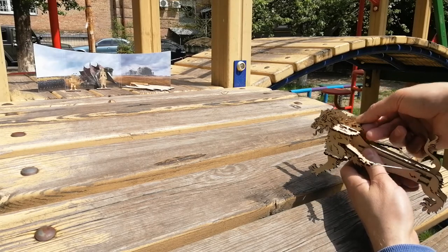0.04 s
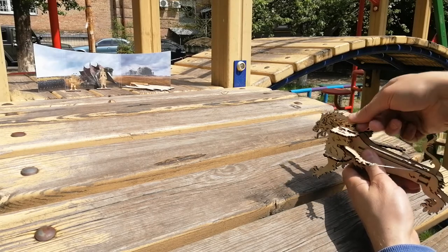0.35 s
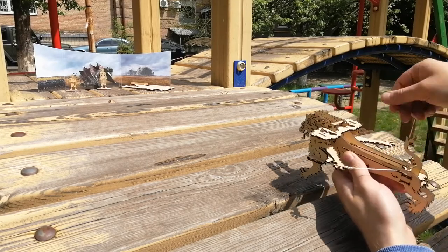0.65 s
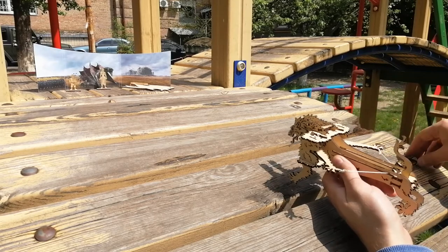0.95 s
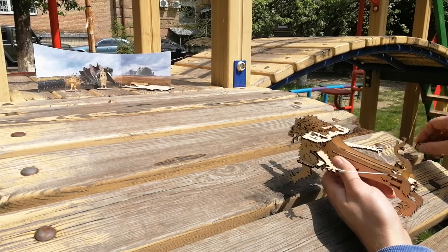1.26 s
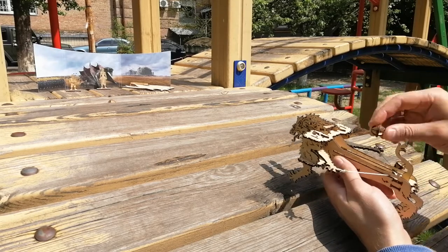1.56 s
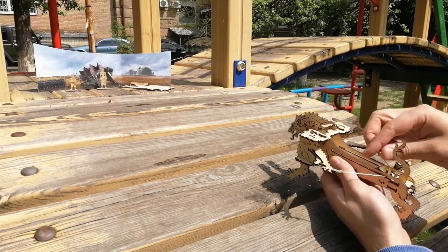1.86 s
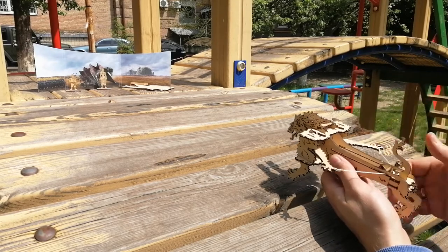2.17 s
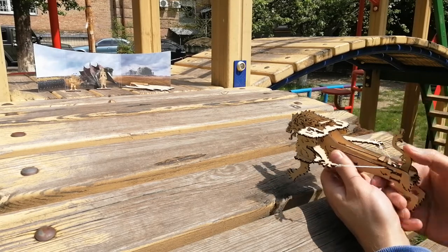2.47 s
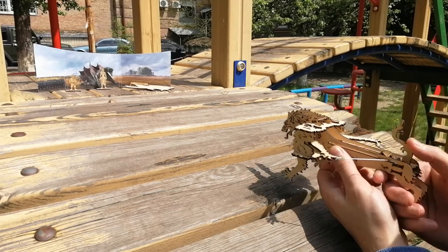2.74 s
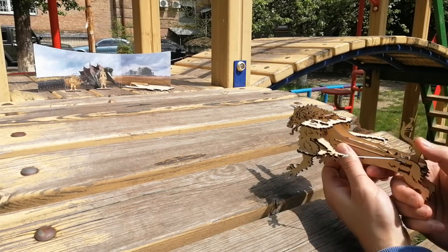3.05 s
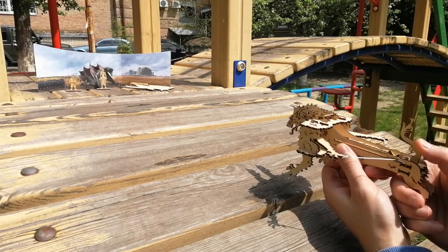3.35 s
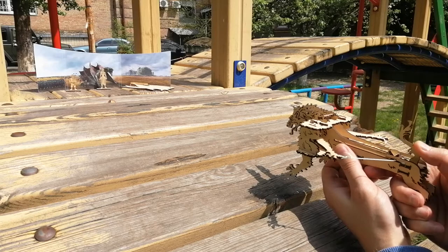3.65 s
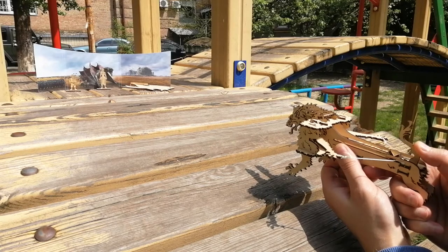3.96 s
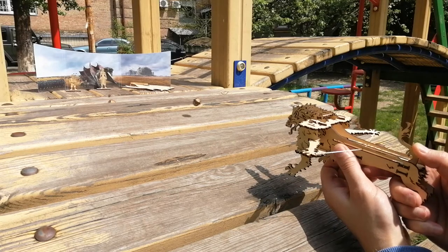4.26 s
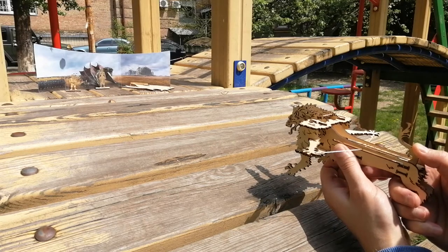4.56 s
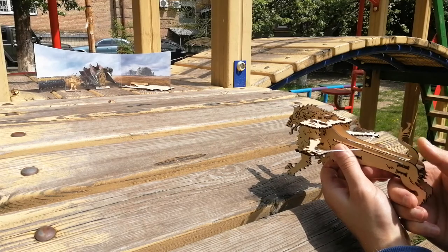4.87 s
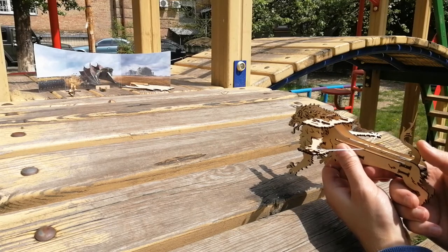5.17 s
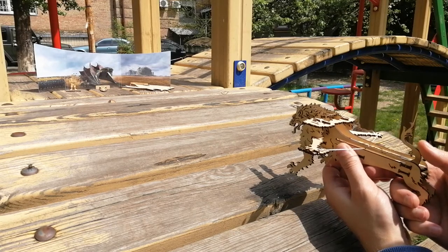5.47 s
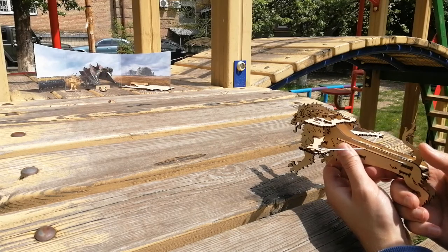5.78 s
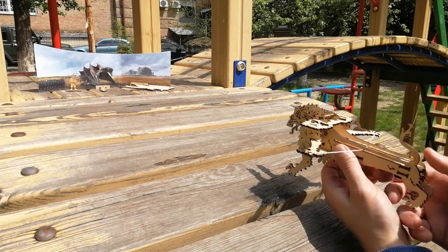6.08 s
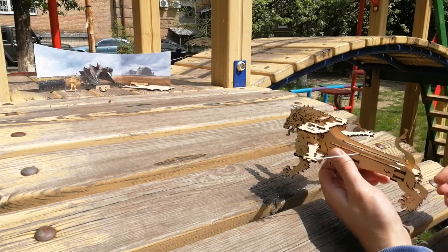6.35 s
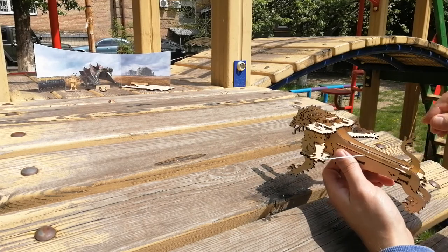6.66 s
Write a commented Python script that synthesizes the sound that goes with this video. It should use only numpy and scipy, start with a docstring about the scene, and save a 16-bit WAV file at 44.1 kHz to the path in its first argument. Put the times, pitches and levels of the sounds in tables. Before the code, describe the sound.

A low town rumble, a soft hush and a faint mains hum run throughout, outdoors. Close to the microphone, fingers rub faintly on a small plywood toy catapult. Around 1.7 to 1.9 seconds a pellet goes into its groove with a few dry clicks and a tiny scrape, while a very faint, thin squeal swells and fades far away. Soft rubbing and a small tick follow. At 3.7 seconds the catch snaps in sharply, slightly left, the loudest click. At 4.2 the toy fires with a quick rattling clack. The pellet skips off a board at 4.3 and hits a card target around 4.5, which clatters over with a slight thud. From 4.7 to 5.4 the pellet and small pieces patter on more distant boards. A brief wind buffet comes at 5.7, then a faint sleeve swish and light gusts from about 6.6 seconds.

```python
"""Outdoors on a wooden deck, a small plywood toy catapult is loaded, cocked and fired close by.
The pellet skips off the boards, knocks a card target over and patters to rest. Each hit is a dry
crack plus the short ring of the part struck; fingers and a sleeve rub with a grainy hiss.
Behind it sit a low town rumble, light wind on the microphone, a faint mains hum and one far squeal."""
import sys
import numpy as np
from scipy import signal
from scipy.fft import rfft, irfft, next_fast_len
from scipy.io import wavfile
from scipy.ndimage import uniform_filter1d, map_coordinates

SR = 44100
rng = np.random.default_rng(int(sys.argv[2]) if len(sys.argv) > 2 else 0)


def to_wav(sig):
    """Store sig (one row per channel, or 1-D mono) as 16-bit WAV at the path in sys.argv[1].

    Samples outside -1..1 are clipped; the rate is SR.
    """
    pcm = np.clip(np.atleast_2d(sig), -1, 1) * 32767
    pcm = np.round(pcm).astype(np.int16)
    wavfile.write(sys.argv[1], SR, pcm.T)  # frames by channels


N = 305166

# Light touches on the groove's rim: start_s, level_db, brightness_db_per_octave
RIM_TOUCHES = [(.182, -62, -3), (1.167, -63.5, 3), (1.724, -47, -3), (1.729, -49.5, -1.5),
               (1.7495, -45, -2), (1.968, -55, 0), (2.908, -56.5, -1.5)]
# The catch snaps in: start_s, relative_level_db, pan_left_db, brightness_db_per_octave
CATCH_SNAPS = [(3.6553, -27, 3, 1), (3.6565, -16.5, 6.5, -.5)]
# The released slider chatters along the frame: start_s, level_db, brightness_db_per_octave
SLIDER_CHATTER = [(4.2113, -34.5, 4), (4.2135, -40, 2), (4.2168, -43, 0), (4.2191, -28, -1.5),
                  (4.2225, -25, -1), (4.2263, -23.5, -.5), (4.2345, -38, -1.5), (4.2388, -33.5, .5)]
# The slider crosses from left to right: time_s, pan_left_db
SLIDER_PAN = [(4.222, 7), (4.243, -6)]
# The pellet skips off a board; the last row is a faint echo of it off the deck: start_s, level_db, pan_left_db,
# brightness_db_per_octave
BOARD_SKIP = [(4.3378, -26.5, 4, 1.5), (4.3405, -42, 0, 7), (4.349, -44, -3, 4)]
# Knocks on the card target: start_s, level_db, brightness_db_per_octave
CARD_KNOCKS = [(4.449, -31, 7), (4.452, -40, 0), (4.456, -44, -1), (4.4595, -42, 1), (4.4647, -32.5, -1),
               (4.4733, -30, 0), (4.4765, -40, -6), (4.484, -35.5, -1.5), (4.4875, -31.5, -1),
               (4.494, -39, -8), (4.502, -46, -6), (4.53, -53, -2), (4.705, -44.5, .5)]
# Pieces land on the far boards: start_s, level_db, brightness_db_per_octave, first_flight_s, pitch_ratio
LANDINGS = [(4.752, -38, 1, 0.0045, 1), (4.891, -44.5, -1.5, 0.003, 1.12), (4.919, -46, -1, .004, .88),
            (4.926, -47, -2.5, .009, .95), (4.99, -57.5, -3.5, .008, .95), (5.03, -60, -5, .005, .7),
            (5.13, -56, -6, 0.0066, .7), (5.172, -59, -4, .005, .8), (5.306, -43.5, -2, .015, .98)]

# The ring of each struck part: pitch_hz, relative_level_db, t60_s
RIM_MODES = [(1785, -1, 0.035), (2030, -6, .025), (2760, 1, 0.025), (3350, -5, .016), (4220, -2, 0.022),
             (5760, 1, 0.019), (7320, -9.5, 0.017)]
GROOVE_MODES = [(2310, -1.5, 0.029), (2480, -7, 0.014), (2630, -6, .02), (2770, -5, 0.02),
                (2970, -10, .012), (5620, -8, .01), (5850, -2, 0.01), (7300, -18, .012), (8900, -18, .008)]
CATCH_MODES = [(2140, -3, 0.018), (2380, -4, 0.016), (2590, 6.5, 0.014), (3300, -10, .012), (3600, -8, .01),
               (3860, -4, 0.012), (4270, -9, .014), (4850, -8, 0.011), (6120, 5, 0.0105),
               (10280, -6, 0.009), (11300, -4, 0.009), (12200, -11, .007)]
FRAME_MODES = [(1590, -7, .016), (1850, 0, 0.017), (2100, -1, 0.016), (2340, -3, .014), (2560, 1, 0.016),
               (2740, 0, .02), (3500, -7, 0.012), (4150, -5, .016), (4600, -5, .016), (5920, -2, 0.017),
               (6840, -5, .014), (7380, -4, 0.018)]
STOP_MODES = [(1725, 2.5, 0.025), (2100, -8, .018), (2560, -6, .016), (2740, -6, .02), (3175, -8, 0.016),
              (3480, -3, .011), (3640, 0, .012), (3830, -3, .011), (4152, -3.5, 0.02), (4370, -7, .016),
              (4540, 0, .02), (4700, -2, .017), (5770, -14, .011), (6840, -12, .018), (7395, -9, .018)]
BOARD_MODES = [(1170, -10, 0.02), (1820, 3, 0.013), (2060, 2, 0.0097), (2390, -8, .008), (2700, -7, 0.008),
               (3600, -19, .008)]
PELLET_MODES = [(3950, -3, .008), (4350, 0, .01), (4800, -1, .009), (5650, -5, .009)]
CARD_MODES = [(290, -7, 0.053), (740, -8, 0.02), (1030, -11, .02), (1216, -3.5, .028), (1390, -1, 0.027),
              (1800, 0, 0.021), (2050, -3, .02), (2340, 1, 0.02), (2650, -3, 0.019)]
DECK_MODES = [(1070, -4, .03), (1540, -3, .025), (1860, 0, .028), (2480, -2, .024), (2760, 0, .026),
              (3170, -3.5, .022), (3430, -4, .026), (3750, -5, .02), (5120, -5, .016), (5920, -7, .016)]
DECK_BASS_MODES = [(80.6, -3, 0.27), (139, -0.5, 0.21), (189, -2, .12), (231, -1, 0.12)]
# EQ of the dry crack on each surface: freq_hz, gain_db
GROOVE_CRACK = [(200, -35), (1150, -18), (1850, 0), (3000, 0), (3700, -5), (4300, -3), (5800, 0),
                (7400, -4), (9200, -6), (10600, -13), (12000, -13), (16400, -44)]
CATCH_CRACK = [(200, -28), (1400, -18), (2400, 2), (3200, -4), (4500, -5), (6100, 0), (7000, -4),
               (8000, -3), (9200, -8), (11700, -3.5), (13000, -10), (16400, -36)]
FRAME_CRACK = [(200, -30), (1300, -26), (1850, -3), (3500, 0), (4500, 1), (5400, -6), (7200, -3),
               (9000, -7), (10500, -9), (11700, -8), (13000, -13), (15000, -27), (16400, -46)]
PELLET_CARD_CRACK = [(120, -8), (290, -2), (480, -7), (750, -2), (1400, 0), (3100, -2), (5000, 0),
                     (8000, -8), (9700, -7), (11500, 1.5), (13300, -10), (15800, -28)]
DECK_CRACK = [(150, -15), (650, -2.5), (1000, 2.5), (1500, 4.5), (2700, 4.5), (3500, 1.5), (5900, -3.5),
              (9100, -14), (12600, -10), (15900, -23)]

# Fingers slide over the toy: centre_s, length_s, skin_db, plywood_db
FINGER_RUBS = [(0.06, 0.09, -73, -79), (0.18, 0.06, -72, -70), (0.465, 0.056, -75, -79),
               (2.213, 0.23, -79, -75), (2.463, 0.15, -78, -63.5), (2.592, 0.07, -80, -71),
               (3.084, 0.037, -78, -68), (6.06, 0.18, -79, -77)]
# The sleeve scuffs as the hand lets go: centre_s, length_s, level_db, pitch_ratio
SLEEVE_SCUFFS = [(6.56, .06, -66, 1), (6.69, .22, -58, 1), (6.78, .06, -57, 1.02), (6.825, .07, -62, 1.02),
                 (6.9, .09, -64, .94)]
# Friction EQ of rubbed plywood, the pellet in its groove and cloth: freq_hz, gain_db
PLYWOOD_EQ = [(1000, -22), (1700, -3), (2800, 3.5), (3600, -7), (5200, 0), (6600, -7), (9000, -15),
              (15000, -30)]
SCRAPE_EQ = [(900, -19), (1780, 3), (2200, -1), (2800, 0), (3600, -11), (4200, -3), (4900, -10), (5700, -3),
             (7600, -8), (9500, -20), (15000, -25)]
CLOTH_EQ = [(500, -23), (4000, -16), (8000, -16), (9500, -6.5), (10800, -2), (12000, -11), (14500, -22),
            (16000, -35)]

# Reverb tail off the far walls: freq_hz, t60_s
WALL_DECAY = [(250, .26), (2000, 0.37), (4500, .3), (6200, 0.38), (9000, .31), (12000, 0.33)]
# The two microphone ports differ in colour: freq_hz, pan_left_db
PORT_COLOUR = [(1300, -2), (2800, 1), (5800, -0.5), (8100, 0.5), (9900, 4), (11600, -11.5), (13200, -7),
               (15100, -1.7)]
# Partials of a far squeal, perhaps a brake: pitch_hz, level_db
SQUEAL_PARTIALS = [(3130, -75.5), (3480, -74.5), (3828, -81)]
# Fader ride on those partials: time_s, gain_db
SQUEAL_FADER = [(1.35, -30), (1.5, -4), (1.58, -4), (1.8, 0.5), (2.05, -7), (2.3, -23)]
# Gusts on the microphone: peak_s, buffet_db, air_db, rise_s, fall_s
GUSTS = [(.095, -41, -75, .03, .03), (.2, -40, -70, .02, .03), (.36, -42, -70, .03, .03),
         (5.67, -34, -78, 0.019, 0.057), (6.755, -34, -55.5, 0.052, 0.049),
         (6.915, -31.5, -52.5, 0.033, 0.061)]
# Noise EQ of wind buffet, rushing air, low rumble and the hush of town and leaves: freq_hz, gain_db
BUFFET_EQ = [(10, -13), (25, -3), (70, 1), (140, -4.5), (190, -11), (260, -33), (600, -66)]
AIR_EQ = [(60, -11), (300, 0.5), (650, -2.5), (1800, -3), (2800, -3), (4000, -13.5), (8100, -22),
          (15900, -36)]
RUMBLE_EQ = [(8, -20.5), (20, -5), (35, 1), (60, 0.5), (100, -5.5), (150, -11.5), (220, -14), (300, -23.5),
             (600, -65)]
HUSH_EQ = [(140, -30.5), (240, -19), (262, -7), (335, -8), (407, -9), (598, -12.5), (726, -11), (1440, -16),
           (1630, -11.5), (4280, -27.5), (5670, -29.5), (8350, -39), (10300, -38.5), (16000, -46)]
# Fader rides on the rumble and the hush: time_s, level_db
RUMBLE_FADER = [(0.1, -46.5), (1.7, -47.5), (2.1, -49), (2.75, -50), (2.95, -44.5), (4.3, -48), (5.0, -47),
                (5.5, -49), (6.5, -48.5)]
HUSH_FADER = [(0.05, -60), (0.3, -58.3), (0.8, -59.3), (2.0, -61.0), (3.0, -60), (5.3, -61), (6.5, -61.0)]
# Mains hum partials: pitch_hz, level_db
MAINS_PARTIALS = [(100, -66.5), (150, -71.5), (199.9, -60.5)]
# Stereo image of the ambience: freq_hz, left_right_correlation
AMBIENCE_IMAGE = [(60, 1.0), (130, 0.98), (290, 0.47), (640, -0.59), (1410, 0.045), (3100, 0.048),
                  (6820, -0.11), (15000, -0.0047)]

SCRAPE_S, SCRAPE_LENGTH_S = 1.791, 0.085  # centre and length of the pellet's push along the groove


def catapult():
    """Hard plywood clicks: the pellet rocks into its groove, the catch snaps, the slider slams home."""
    rocking = bounces(1.855, -27, -12, flight_s=.0142, shrink=1, loss_db=6.5, dull_db=1.5)
    seating = placed([(1.8527, -29.5, 2)] + rocking, pan_db=8.5)  # clicks past the rim, then drops in
    slam = bounces(4.2417, -21.5, -.5, flight_s=.0028, shrink=.9, loss_db=2.4, dull_db=0)
    touches = placed(RIM_TOUCHES + slips(count=12), pan_db=5.5)
    rim = contacts(touches, RIM_MODES, GROOVE_CRACK, crack_db=-4.5, crack_t60=.026, lead_ms=.12)
    groove = contacts(seating, GROOVE_MODES, GROOVE_CRACK, crack_db=-10, crack_t60=.022, lead_ms=.14)
    catch = contacts(CATCH_SNAPS, CATCH_MODES, CATCH_CRACK, crack_db=-8.5, crack_t60=.03, lead_ms=.14)
    slider = contacts(on_slider(SLIDER_CHATTER), FRAME_MODES, FRAME_CRACK,
                      crack_db=-3.5, crack_t60=.021, lead_ms=.09)
    stop = contacts(on_slider(slam), STOP_MODES, FRAME_CRACK, crack_db=-4.5, crack_t60=.018, lead_ms=.05)
    return rim + groove + amp(-1.55) * catch + slider + stop


def contacts(hits, modes, crack_eq, crack_db, crack_t60, lead_ms):
    """Each hit layers a sharp crack over the part's ring; the left channel leads by lead_ms."""
    out, t = np.zeros((2, N + SR)), np.arange(SR // 8) / SR
    mode_hz, mode_db, t60 = np.transpose(modes)[:, :, None]
    # a part radiates little below its lowest mode
    low_cut = signal.butter(2, 1.35 * mode_hz.min(), "highpass", fs=SR, output="sos")
    for start_s, db, pan_db, bright_db in hits:
        tilt = lambda hz: bright_db * np.log2(np.clip(hz, 1000, 12000) / 3500)
        # each mode radiates a little differently to left and right
        phase = rng.uniform(0, 2 * np.pi, mode_hz.shape) + rng.normal(0, .18, (2, len(modes), 1))
        ring_db = mode_db + tilt(mode_hz) + rng.normal(0, 1.7, phase.shape)
        contact_s = .00018 * amp(-1.4 * bright_db)  # dull hits stay in contact longer
        attack = 1 - np.exp(-t / contact_s)
        detuned_hz = mode_hz * (1 + .005 * rng.uniform(-1, 1, mode_hz.shape))
        partials = amp(ring_db - 60 * t / t60) * np.sin(2 * np.pi * detuned_hz * t + phase)
        ring = signal.sosfilt(low_cut, attack * partials.sum(axis=1))
        grit = rng.standard_normal(len(t)) + 1.2 * rng.standard_normal((2, len(t)))
        grit *= amp(-60 * t / crack_t60)  # dense high modes that die at once
        grit[:, 0] += 7  # the spike of first touch
        grit = np.pad(grit, ((0, 0), (16, 0)))
        crack = filtered(grit, lambda hz: amp(along(crack_eq, hz) + tilt(hz)))[:, :len(t)]
        hit = unit(unit(ring) + amp(crack_db + bright_db) * unit(crack))
        hit = hit * np.sqrt(.005 / t[-1]) * amp(db) * sides(pan_db)  # level as if packed into 5 ms
        out[0, round(start_s * SR):][:len(t)] += hit[0]
        out[1, round((start_s + lead_ms / 1000) * SR):][:len(t)] += hit[1]
    return out[:, :N]


def bounces(start_s, db, bright_db, flight_s, shrink, loss_db, dull_db):
    """A hit and two rebounds, each losing energy; every flight is shrink times the one before."""
    k = np.arange(3)
    elapsed_s = np.concatenate([[0], np.cumsum(flight_s * shrink ** k)[:-1]])
    return list(zip(start_s + elapsed_s, db - loss_db * k, bright_db - dull_db * k))


def slips(count):
    """Tiny uneven ticks as the pellet catches and slips along its groove, loudest mid-push."""
    jitter, strength = rng.uniform(-1, 1, (count, 2)).T
    position = (np.arange(count) + .5 + jitter / 2) / count - .5
    level_db = -55 + 2.5 * strength + 20 * np.log10(np.cos(np.pi * position) + .01)
    return [(s, db, -1) for s, db in zip(SCRAPE_S + SCRAPE_LENGTH_S * position, level_db)]


def on_slider(hits):
    """Pan hits to follow the moving slider."""
    return [(s, db, np.interp(s, *np.transpose(SLIDER_PAN)), bright_db) for s, db, bright_db in hits]


def pellet():
    """The pellet skips off a board, then lands, loses most of its energy and patters in quickening hops."""
    land_s, land_db, flight_s, shrink = 5.0808, -42.5, .106, .575
    rebounds = bounces(land_s + flight_s, land_db - 14, -.71, flight_s * shrink, shrink,
                       loss_db=5, dull_db=-1.5)
    hops = placed([(land_s, land_db, .6)] + rebounds, pan_db=1.2)
    skip = contacts(BOARD_SKIP, BOARD_MODES, PELLET_CARD_CRACK,
                    crack_db=-16.5, crack_t60=.02, lead_ms=-.11)
    patter = contacts(hops, PELLET_MODES, PELLET_CARD_CRACK, crack_db=-4.5, crack_t60=.011, lead_ms=-.18)
    return skip + patter


def card_target():
    """The struck card clatters over, more papery crack than ring."""
    knocks = placed(CARD_KNOCKS, pan_db=.3)
    return contacts(knocks, CARD_MODES, PELLET_CARD_CRACK, crack_db=2, crack_t60=.017, lead_ms=-.17)


def falling_pieces():
    """Toppled pieces bounce on the far boards, each at its own pitch."""
    out = np.zeros((2, N))
    for *landing, pitch_ratio in LANDINGS:
        hits = placed(bounces(*landing, shrink=.95, loss_db=7, dull_db=.8), pan_db=-.7)
        modes = np.multiply(DECK_MODES, [pitch_ratio, 1, 1])
        out += contacts(hits, modes, DECK_CRACK, crack_db=2, crack_t60=.018, lead_ms=-.24)
    return out


def deck_thud(start_s=4.474, gain_db=-44):
    """The deck's low modes put weight under the falling target."""
    t = np.maximum(np.arange(N) / SR - start_s, 0)
    ring = sum(amp(db - 60 * t / t60) * np.sin(2 * np.pi * hz * t) for hz, db, t60 in DECK_BASS_MODES)
    return amp(gain_db) * ring


def rubbing():
    """Friction layer: skin hisses on plywood, the pellet scrapes its groove, the sleeve swishes."""
    skin_eq = lambda hz: -np.minimum(28 * np.log2((hz + 1) / 10000) ** 2, 50)  # a band around 10 kHz
    plywood_eq = lambda hz: along(PLYWOOD_EQ, hz)
    fingers = sum(stroke(s, length_s, skin_db, skin_eq) + stroke(s, length_s, plywood_db, plywood_eq)
                  for s, length_s, skin_db, plywood_db in FINGER_RUBS)
    scrape = stroke(SCRAPE_S, SCRAPE_LENGTH_S, db=-54.5, eq=lambda hz: along(SCRAPE_EQ, hz))
    sleeve = sum(stroke(s, length_s, db, lambda hz: along(CLOTH_EQ, hz / pitch_ratio), grain_db=1.5)
                 for s, length_s, db, pitch_ratio in SLEEVE_SCUFFS)
    return fingers + scrape + sleeve


def stroke(centre_s, length_s, db, eq, grain_db=3.6):
    """A swell of noise with the grain of surfaces that stick and slip."""
    t, out = np.arange(N) / SR, np.zeros((2, N))
    span = np.abs(t - centre_s) < length_s / 2
    hiss = noise(eq, lambda hz: np.full_like(hz, .1), span.sum())
    grain = amp(grain_db * unit(uniform_filter1d(rng.standard_normal(span.sum()), size=140)))
    swell = np.cos(np.pi * (t[span] - centre_s) / length_s)
    out[:, span] = amp(db) * swell * unit(hiss * grain)
    return out


def yard_reverb(x, boards_db, walls_db, boards_t60=.075):
    """Nearby boards and posts scatter quick reflections; the far walls add a faint tail."""
    hz, frame_s, spectrum = signal.stft(rng.standard_normal((2, SR // 2)), SR, nperseg=256)
    wall_decay = amp(-60 * frame_s / along(WALL_DECAY, hz)[:, None])
    walls = signal.istft(spectrum * wall_decay, SR, nperseg=256)[1]
    t = np.arange(walls.shape[1]) / SR
    boards_eq = lambda hz: along([(300, -5), (1200, -1), (3000, 1), (6000, -4), (14000, -10)], hz)
    boards = noise(boards_eq, lambda hz: np.full_like(hz, .2), len(t))
    boards *= amp(-60 * t / boards_t60) * np.clip((t - .005) / .007, 0, 1)
    impulse = amp(boards_db) * unit(boards) + amp(walls_db) * unit(walls * (t > .015))
    return signal.fftconvolve(x, impulse / np.sqrt(len(t)), axes=1)[:, :N]


def far_squeal():
    """A few thin, wavering partials swell and fade in the distance."""
    t, fader_db = np.arange(N) / SR, curve(SQUEAL_FADER)
    gate = (t > SQUEAL_FADER[0][0]) & (t < SQUEAL_FADER[-1][0])
    channel = lambda: sum(amp(db + fader_db + 2.3 * wobble(8.9)) * np.sin(2 * np.pi * hz * t + wobble(14))
                          for hz, db in SQUEAL_PARTIALS)
    return gate * np.array([channel(), channel()])


def wind():
    """Short gusts hit the microphone with a low buffet and an airy rush."""
    t = np.arange(N) / SR
    peak_s, buffet_db, air_db, rise_s, fall_s = np.transpose(GUSTS)[:, :, None]
    gusts = np.exp(-np.maximum((peak_s - t) / rise_s, (t - peak_s) / fall_s))
    buffet = np.sum(amp(buffet_db) * gusts, axis=0) * noise_bed(BUFFET_EQ)
    air = np.sum(amp(air_db) * gusts, axis=0) * noise_bed(AIR_EQ)
    return buffet + air


def mains_hum():
    """Faint mains harmonics, drifting a little in level and phase."""
    t = np.arange(N) / SR
    return sum(amp(db + 2.24 * wobble(2.985)) * np.sqrt(2) * np.sin(2 * np.pi * hz * t + .11 * wobble(3.6))
               for hz, db in MAINS_PARTIALS)


def far_drone(pitch_hz=323):
    """A narrow band of noise swells once, low and far off."""
    return stroke(5.27, length_s=.32, db=-62.5, eq=lambda hz: -np.minimum(abs(hz - pitch_hz) / 5, 70))


def ambience():
    """The outdoor bed: rumble and wind from the left, the hush of town and leaves, hum and drone."""
    rumble = amp(curve(RUMBLE_FADER) + 1.46 * wobble(9)) * noise_bed(RUMBLE_EQ)
    hush = amp(curve(HUSH_FADER) + .96 * wobble(1.72)) * noise_bed(HUSH_EQ)
    return from_left(rumble + wind(), lead_ms=.55) + hush + mains_hum() + far_drone()


def noise_bed(eq_points):
    """Noise from all around: centred in the bass, wide in the treble."""
    return noise(lambda hz: along(eq_points, hz), lambda hz: along(AMBIENCE_IMAGE, hz), N)


def noise(eq, correlation, size):
    """Mid/side noise at rms 1; eq (dB) and correlation are functions of frequency."""
    def response(hz):
        width = np.arccos(np.clip(correlation(hz), -1, 1)) / 2
        return amp(eq(hz)) * [np.cos(width), np.sin(width)]
    mid, side = filtered(rng.standard_normal((2, size)), response)
    return unit(np.array([mid + side, mid - side]))


def placed(hits, pan_db):
    """Give all hits the same pan."""
    return [(s, db, pan_db, bright_db) for s, db, bright_db in hits]


def sides(pan_db):
    """Constant-power pan gains; positive is left."""
    pair = amp(np.array([np.atleast_1d(pan_db), -np.atleast_1d(pan_db)]) / 2)
    return pair / np.sqrt(np.mean(pair ** 2, axis=0))


def from_left(x, lead_ms):
    """The sound reaches the left channel just before the right."""
    return filtered(x, lambda hz: np.exp(1j * np.pi * hz * lead_ms / 1000 * np.array([[1], [-1]])))


def filtered(x, response):
    """Apply a gain that is a function of frequency."""
    n = x.shape[-1]
    padded = next_fast_len(n + 8192)
    return irfft(rfft(x, padded) * response(np.fft.rfftfreq(padded, 1 / SR)), padded)[..., :n]


def along(points, hz):
    """Read (freq_hz, value) points on a log frequency axis."""
    point_hz, values = np.transpose(points)
    return np.interp(np.log(hz + 1), np.log(point_hz + 1), values)


def curve(points):
    """Automation: (time_s, value) points as one value per sample."""
    return np.interp(np.arange(N) / SR, *np.transpose(points))


def wobble(rate_hz):
    """Smooth random modulation, rate_hz knots a second."""
    return map_coordinates(rng.standard_normal(int(N * rate_hz / SR) + 4), [np.arange(N) * rate_hz / SR])


def amp(db):
    """Decibels to gain."""
    return 10 ** (np.asarray(db) / 20)


def unit(x):
    """Scale to rms 1."""
    return x / np.sqrt(np.mean(x ** 2) + 1e-20)


def scene():
    """The mix: catapult close and dry, target further off and wetter, ambience underneath."""
    clicks, hops, card, pieces = catapult(), pellet(), card_target(), falling_pieces()
    reverb = (yard_reverb(clicks, boards_db=-26, walls_db=-32)
              + yard_reverb(hops, boards_db=-17.5, walls_db=-23)
              + yard_reverb(card, boards_db=-16, walls_db=-24, boards_t60=.17)
              + yard_reverb(pieces, boards_db=-9.5, walls_db=-21))
    impacts = filtered(clicks + hops + card + pieces + reverb, lambda hz: sides(along(PORT_COLOUR, hz)))
    return impacts + deck_thud() + rubbing() + far_squeal() + ambience()


def record(dry):
    """A steep high cut closes between 15.8 and 16.4 kHz."""
    return filtered(dry, lambda hz: np.clip((16400 - hz) / 600, 0, 1))


dry = scene()
out = record(dry)
to_wav(out)
```